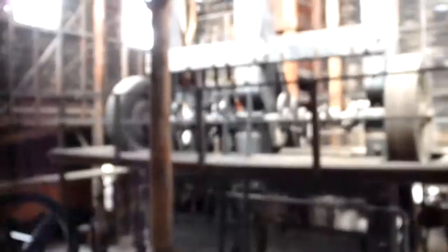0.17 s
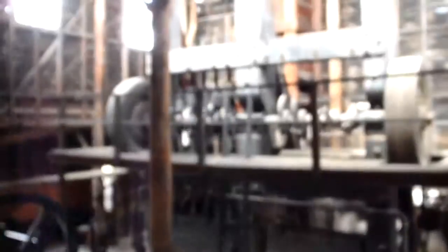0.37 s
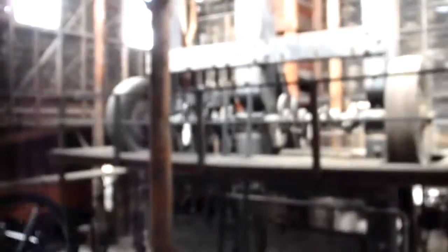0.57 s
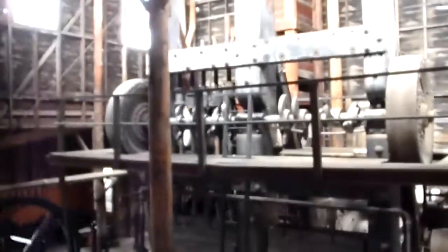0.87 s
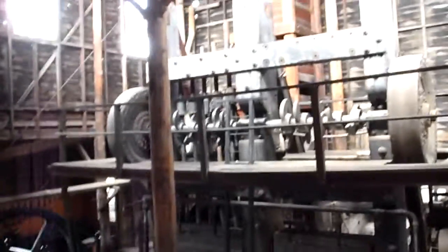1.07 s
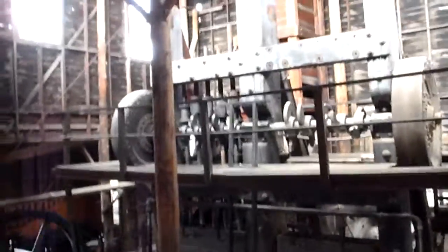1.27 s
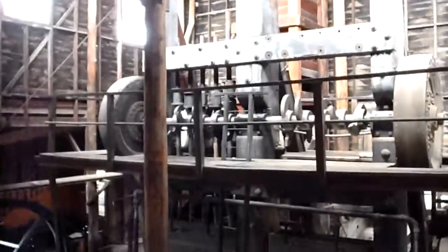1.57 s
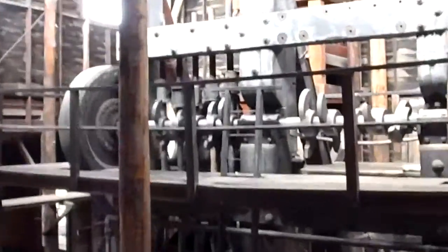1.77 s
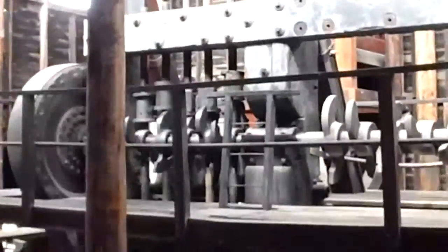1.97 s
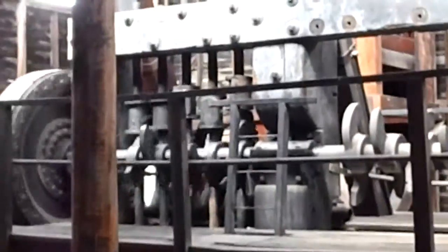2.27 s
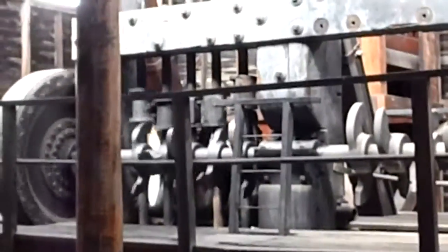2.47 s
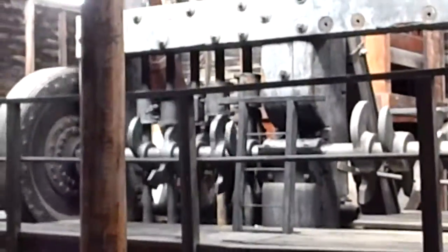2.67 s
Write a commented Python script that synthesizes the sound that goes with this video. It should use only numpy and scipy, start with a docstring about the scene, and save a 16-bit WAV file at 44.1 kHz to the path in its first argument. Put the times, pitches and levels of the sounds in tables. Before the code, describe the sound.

Heavy iron stamps crash down in uneven rapid succession, ringing and rattling over low machinery rumble

```python
"""A stamp mill pounds in a large timber and sheet-metal shed, heard from several metres away.
After a moment of silence we drop into the tail of a blow, with the drive rumbling underneath.
Cams lift iron stamps that drop in a limping round of eight: grain bursts crack, then swell into the shed,
and tuned resonances ring stems and frame. Knocks, iron chatter and faint wavering cam squeals soon join.
A soft low bump passes before the hardest crack, halfway through; the round then pounds on to the end."""
import sys
import numpy as np
from scipy import signal
from scipy.fft import rfft, irfft, next_fast_len
from scipy.io import wavfile

SR = 44100
rng = np.random.default_rng(int(sys.argv[2]) if len(sys.argv) > 2 else 0)


def unload_wav(signal):
    """Save mono or channel-first audio to the path in sys.argv[1] as 16-bit WAV at rate SR, clipped to [-1, 1]."""
    wavfile.write(
        sys.argv[1],
        SR,
        np.round(np.clip(np.atleast_2d(signal).T, -1, 1) * 32767).astype(np.int16),
    )


N = 124362
T = np.arange(N) / SR
PADDED = next_fast_len(N, True)
HZ = np.maximum(np.fft.rfftfreq(PADDED, 1 / SR), 1)
GRAIN_S = 0.0014  # smoothing time of the grain sizes


def undb(db):
    """Decibels to gain."""
    return 10 ** (np.asarray(db) / 20)


def curve(points):
    """Gain at every frequency, drawn through (f/Hz, level/dB) points on a log-frequency axis."""
    hz, db = np.array(points).T
    return undb(np.interp(np.log(HZ), np.log(hz), db))


def unit(x):
    """Scale to rms 1."""
    return x / np.sqrt(np.mean(x ** 2))


def shape(x, gain):
    """Filter by a gain at every frequency."""
    return irfft(rfft(x, PADDED) * gain, PADDED)[:N]


def walk(step_s):
    """Smooth random wander of rms 1; a longer step wanders more slowly."""
    return unit(shape(rng.standard_normal(N), np.exp(-(HZ * step_s) ** 2)))


def grains(spread_db):
    """Dense contacts and reflections of uneven size: noise with a rapidly wandering level."""
    sizes = undb(spread_db * np.clip(walk(GRAIN_S), -2, 2))
    return unit(rng.standard_normal(N) * sizes)


def zones(boom_hz=380, hiss_hz=2600):
    """Boom, clatter and hiss ranges, split at two borders; their powers sum to one."""
    low = 1 / (1 + (HZ / boom_hz) ** 4)
    high = 1 / (1 + (hiss_hz / HZ) ** 6)
    return np.sqrt(low), np.sqrt((1 - low) * (1 - high)), np.sqrt((1 - low) * high)


def swell(start, length):
    """A rounded rise and fall."""
    progress = np.clip((T - start) / length, 0, 1)
    return np.sqrt(np.abs(np.sin(np.pi * progress)))


def age_of(start):
    """Seconds since a blow, zero before it."""
    return np.maximum(T - start, 0)


def decay(age, t60):
    """Exponential fade that falls 60 dB in t60 seconds."""
    return np.exp(-np.log(1000) * age / t60)


# Stamp blows: t/s, place in the round, crack level/dB, boom level/dB, clatter level/dB,
# hiss level/dB, clatter t60/s; levels are relative to the crack and shed faders
STAMP_BLOWS = [(.02, "h", -13, -7.5, -5, -3, 0.96), (.122, "a", 5.5, -2, 1.5, -0.5, 1),
               (0.31, "b", 6, -3, 1, 0, 1), (.441, "c", 2, 1.5, -2.5, -2.5, 0.91),
               (0.73, "d", 9, 2, 3, 5, 0.84), (0.927, "e", 4.5, -0.5, 1.5, -0.5, 0.9),
               (1.106, "f", 6.5, 0, -1, 2.5, .6), (1.248, "g", -1, -1, 2, -6, 0.48),
               (1.503, "h", 14, 4.5, 4, 4.5, 1), (1.731, "a", 10, -2.5, 4, 2, 0.73),
               (1.923, "b", 5.5, 2.5, 4.5, 0, 0.98), (2.06, "c", 6.5, 8.5, 5, 3, 0.75),
               (2.346, "d", 7.5, 2, 3, 7, 0.59), (2.544, "e", -2.5, -4.5, 1, 0, 0.39),
               (2.728, "f", 1.5, -4.5, -1.5, -1.5, 1)]
# Extra colour of the crack: f/Hz, level/dB
CRACK_TONE = [(60, -20), (170, -6), (330, -6), (600, -2), (1200, -3), (2200, 4.5), (3200, 1.5),
              (5000, -4.5), (7000, -5.5), (13000, -8.5)]
CRACK_DB, CRACK_GRAIN_DB = -30, 2  # fader and grain spread, shared with the rebounds


def cracks(attack_s=0.0045, length_s=0.022):
    """Iron lands on iron: a tight cluster of contacts and first reflections."""
    power = 0
    for start, _, db, *_ in STAMP_BLOWS:
        age = age_of(start)
        attack = np.minimum(age / attack_s, 1)
        power = power + (undb(db) * attack * np.exp(-(age / length_s) ** 2)) ** 2
    return undb(CRACK_DB) * shape(np.sqrt(power) * grains(CRACK_GRAIN_DB), curve(CRACK_TONE))


SHED_DB, SHED_GRAIN_DB = -28, 1.8
# boom, clatter, hiss: build-up time in seconds, and t60 relative to the clatter
BUILD_S, LINGER = (0.014, 0.018, 0.024), (1.14, 1, 0.91)


def shed():
    """Each blow builds up in the shed and dies away; the boom builds fastest and stays longest."""
    out, echoes = 0, grains(SHED_GRAIN_DB)
    for k, (zone, build, linger) in enumerate(zip(zones(), BUILD_S, LINGER)):
        power = 0
        for start, _, _, *db, t60 in STAMP_BLOWS:
            age = age_of(start)
            build_up = 1 - np.exp(-age / build)
            power = power + (undb(db[k]) * build_up * decay(age, t60 * linger)) ** 2
        out = out + shape(np.sqrt(power) * echoes, zone)
    return undb(SHED_DB) * out


# Modes shared by frame and stems: f/Hz, t60/s, level/dB at resonance over the direct force
FRAME_MODES = [(167, 0.69, 4), (190, 0.46, 4.5), (321, 0.047, -9.5), (531, 0.25, 2.5), (582, .08, -13),
               (1035, .1, -9), (1356, 0.097, -5), (1660, 0.08, 4.5), (2350, 0.18, -1), (3109, 0.072, 1),
               (3990, 0.3, 1), (4080, 0.27, 8), (4880, 0.36, 2), (6143, 0.21, 7), (6298, 0.099, 5),
               (6450, .25, 5)]
# Colour of the mill in the shed: f/Hz, relative level/dB
MILL_TONE = [(30, -36), (70, -22), (105, -19), (150, -2.5), (220, -1.5), (400, -2), (480, -3), (600, 1),
             (700, 0.5), (790, -3.5), (900, -0.5), (1150, 2.5), (1480, -1), (1700, -3.5), (1800, -5.5),
             (2100, -3.5), (2250, -11.5), (2550, -8), (2850, -12.5), (3600, -10), (4400, -6), (5300, -4.5),
             (6300, -11.5), (7200, -20), (8700, -28), (10200, -35.5), (11400, -31.5), (14500, -39)]


def ironwork(force):
    """Frame and stems colour every contact and ring on in their modes, as one-pole resonators."""
    out = force
    for hz, t60, db in FRAME_MODES:
        pole = np.exp((2j * np.pi * hz - np.log(1000) / t60) / SR)
        ring = signal.lfilter([1], [1, -pole], force).real
        out = out + 2 * undb(db) * (1 - abs(pole)) * ring  # resonance peak set by the level
    return shape(out, unit(curve(MILL_TONE)))


# Own ring of the stamp at each place in the round: f/Hz, blur setting/Hz, level/dB, t60/s
STAMP_NOTES = {"a": [(2080, 96, -32, 0.56), (2226, 280, -32.5, 0.6)], "b": [(545, 41.5, -35.5, 0.98),
               (1084, 127, -21.5, 0.1)], "c": [(1315, 34, -30, 0.54), (1674, 61, -37, 0.69),
               (2460, 70, -35, 0.45)], "d": [(990, 40, -32.5, 0.47), (1250, 44.5, -31, 0.57),
               (1620, 78.6, -37.5, .5), (2124, 211, -27, 0.1)], "e": [(1600, 26.6, -32, 0.34)],
               "f": [(1127, 79.5, -33, 0.41), (2150, 307, -36, 0.34)], "g": [(583, 112, -42, 0.91),
               (2340, 314, -40.5, 0.32)], "h": [(685, 68, -34, 0.29), (1250, 11.6, -44, 1),
               (6220, 16, -32, 0.2)]}


def clanks(attack_s=0.0062):
    """Each stamp rings with its own few notes, blurred by the shed, every time it falls."""
    out = 0
    for place, notes in STAMP_NOTES.items():
        ages = [age_of(start) for start, which, *_ in STAMP_BLOWS if which == place]
        for hz, width, db, t60 in notes:
            fade = sum((1 - np.exp(-age / attack_s)) * decay(age, t60) for age in ages)
            # random phase drift smears the note; the filter trims its skirts
            drift = np.cumsum(rng.standard_normal(N)) * np.sqrt(2 * np.pi * width / SR)
            blurred = np.sin(2 * np.pi * hz * T + drift)
            ring = shape(blurred, 1 / np.hypot(1, (HZ - hz) / width))
            out = out + undb(db) * fade * unit(ring)
    return out


# Stamps that bounce and knock again: t/s, level/dB relative to the crack fader
BOUNCES = [(0.331, 8.5), (.457, 6.5), (0.743, 2), (.797, 1), (1.508, 11), (1.524, 12.5), (1.532, -5),
           (1.601, 7), (1.751, -1), (2.079, 7), (2.124, 0.5), (2.381, 10.5), (.184, -2), (1.663, -4.5),
           (2.017, -4), (2.271, 1.5)]
# Colour of these knocks: f/Hz, level/dB
BOUNCE_TONE = [(60, -20), (250, -14), (700, 4.5), (1500, 1.5), (2600, 4), (4500, -4), (13000, -7)]


def rebounds(decay_s=0.0059):
    """Short, duller knocks as a bouncing stamp lands again."""
    force = sum(undb(db) * (T > start) * np.exp(-age_of(start) / decay_s) for start, db in BOUNCES)
    return undb(CRACK_DB) * shape(force * grains(CRACK_GRAIN_DB), curve(BOUNCE_TONE))


# Rattles of tappets and rebounding stamps: t/s, length/s, body level/dB, steel hiss level/dB
# (levels relative to the rattle fader)
LOOSE_IRON = [(0.365, 0.098, -11.5, -1), (0.524, 0.063, -7, -15), (.62, 0.19, -25, -12),
              (0.788, 0.039, -12, -10), (1.034, 0.12, -6.5, -13), (1.229, .11, -8, -7.5),
              (1.436, 0.13, -4, -7.5), (1.556, 0.077, -7, 6), (1.631, 0.069, -1, -9), (1.943, 0.18, -7, 0),
              (2.109, 0.074, 1.5, -7), (2.205, .11, 2.5, -2), (2.374, 0.069, -4.5, -1),
              (2.77, 0.071, -3.5, 0)]
# Extra colour of rattling steel: f/Hz, level/dB
STEEL_TONE = [(2500, -14), (5000, -2.5), (7500, 0), (9500, 4.5), (14000, 0.5)]
RATTLE_DB, RATTLE_GRAIN_DB = -30.5, 2.5


def rattles():
    """Loose iron chatters in short flurries, now thicker, now thinner."""
    boom, clatter, hiss = zones()
    chatter = grains(RATTLE_GRAIN_DB) * undb(1.44 * walk(0.0085))
    body = sum(undb(db) * swell(start, length) for start, length, db, _ in LOOSE_IRON)
    steel = sum(undb(db) * swell(start, length) for start, length, _, db in LOOSE_IRON)
    low_chatter = shape(body * chatter, np.hypot(boom, clatter))
    steel_chatter = shape(steel * chatter, hiss * curve(STEEL_TONE))
    return undb(RATTLE_DB) * (low_chatter + steel_chatter)


# Cam squeals: t/s, length/s, centre f/Hz, level/dB before flutter
CAM_SQUEALS = [(0.358, 0.087, 4820, -40), (0.738, 0.07, 5400, -32), (0.784, 0.095, 4910, -32),
               (0.87, 0.11, 4870, -39.5), (1.406, 0.1, 4880, -46), (1.673, 0.089, 4840, -46),
               (1.98, 0.12, 4930, -38), (2.127, 0.22, 4900, -42.5)]


def squeals(waver=0.002, flutter_db=2):
    """A cam slides under its tappet and sets a thin tone going, wavering in pitch and level."""
    wavering_time = np.cumsum(1 + waver * walk(0.0027)) / SR
    tones = 0
    for start, length, hz, db in CAM_SQUEALS:
        tone = np.sin(2 * np.pi * hz * wavering_time)
        tones = tones + undb(db) * swell(start, length) * tone
    return tones * undb(flutter_db * walk(0.014))


def bump(at_s=1.168, width_s=0.006, hz=52, db=-44):
    """One soft, low bump: a few milliseconds of deep tone under a bell-shaped envelope."""
    offset = T - at_s
    return undb(db) * np.exp(-(offset / width_s) ** 2) * np.cos(2 * np.pi * hz * offset)


# Drive rumble: f/Hz, relative level/dB
DRIVE_TONE = [(25, -24), (90, -32), (160, -6.5), (600, 5), (1400, -5), (2600, -16), (5000, -9), (7500, -25),
              (10000, -31.5), (14500, -34)]
DRIVE_DB = -43


def drive():
    """Belt, wheel and camshaft rumble on: coloured noise with a slightly wandering level."""
    level = undb(DRIVE_DB + 0.4 * walk(0.045))
    return level * shape(rng.standard_normal(N), unit(curve(DRIVE_TONE)))


def scene():
    """The whole mill, in mono."""
    contacts = cracks() + rebounds() + shed() + rattles()
    mill = ironwork(contacts) + clanks()
    return (mill + squeals() + bump() + drive())[None]


def record(dry, start_s=0.071, fade_s=0.0013, top_hz=14150):
    """The sound fades in quickly after a moment of silence; a steep low-pass cuts the top."""
    opened = dry * np.clip((T - start_s) / fade_s, 0, 1)
    low_pass = signal.ellip(10, 0.2, 70, top_hz, fs=SR, output="sos")
    return signal.sosfilt(low_pass, opened)


dry = scene()
out = record(dry)
unload_wav(out)
```